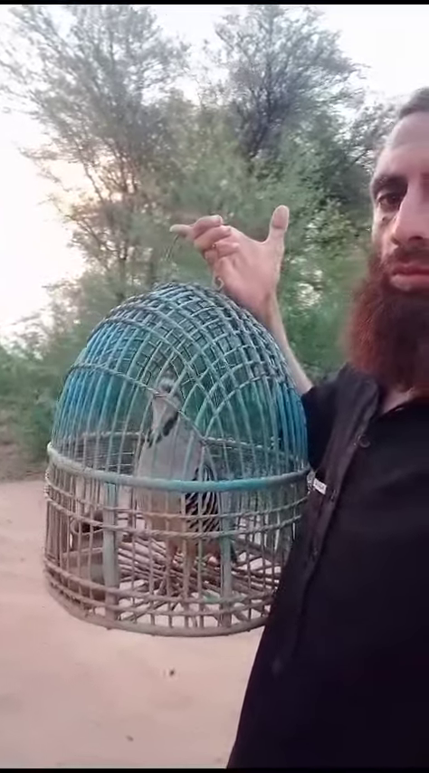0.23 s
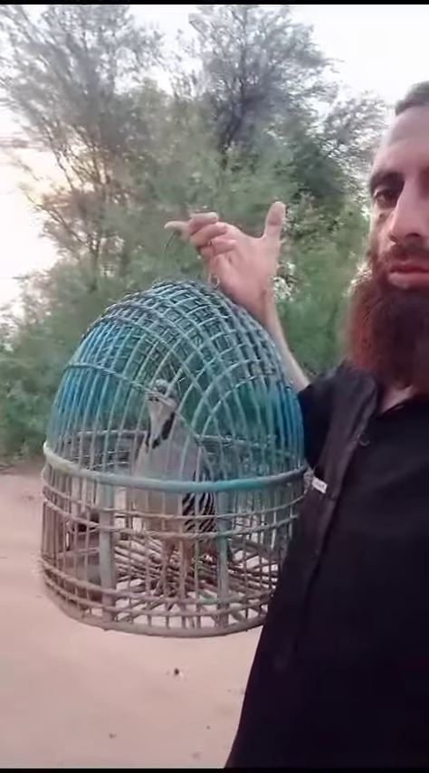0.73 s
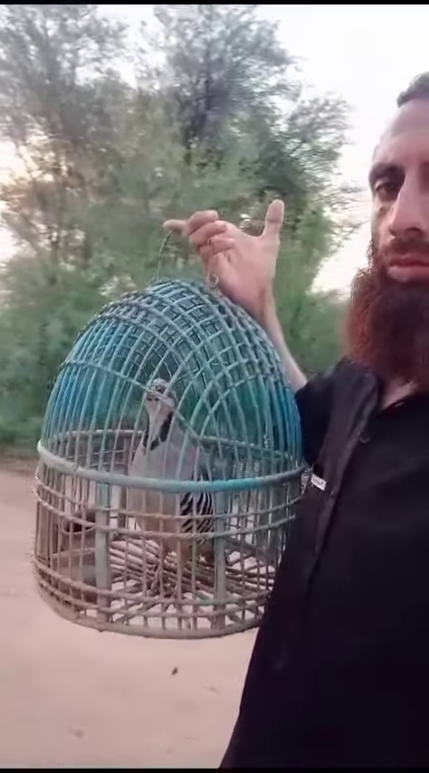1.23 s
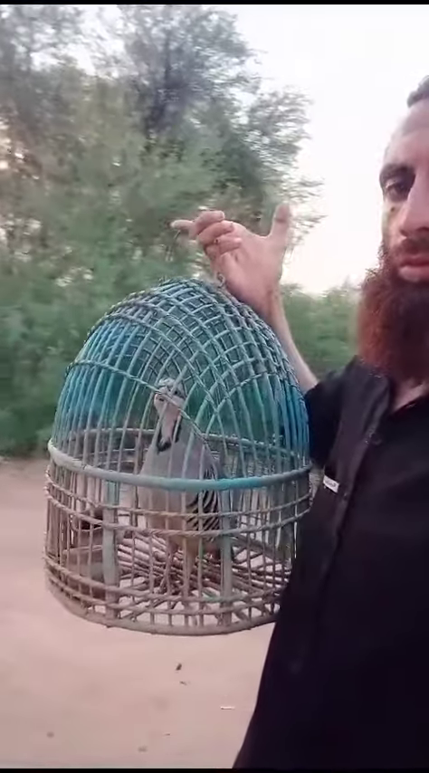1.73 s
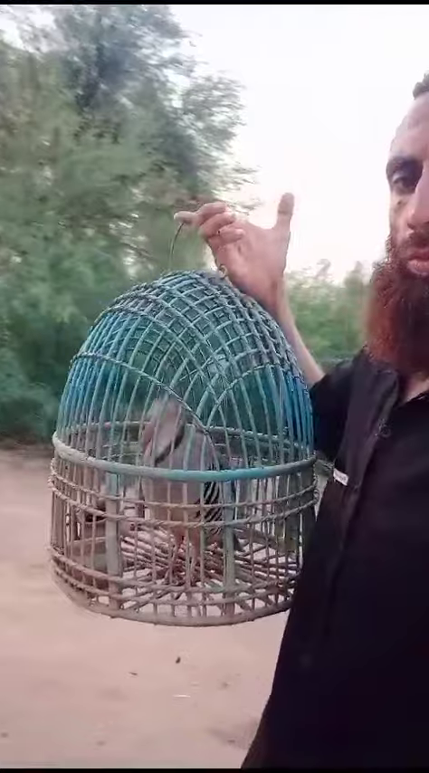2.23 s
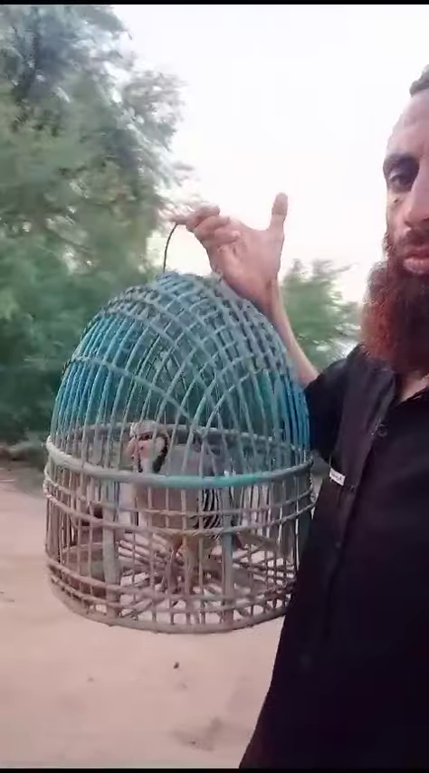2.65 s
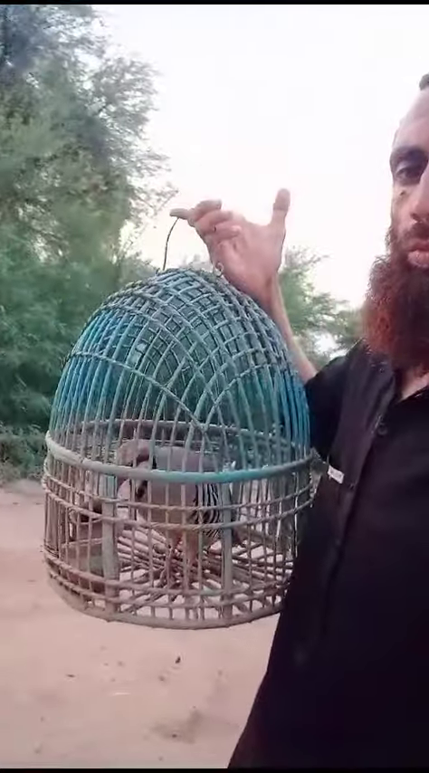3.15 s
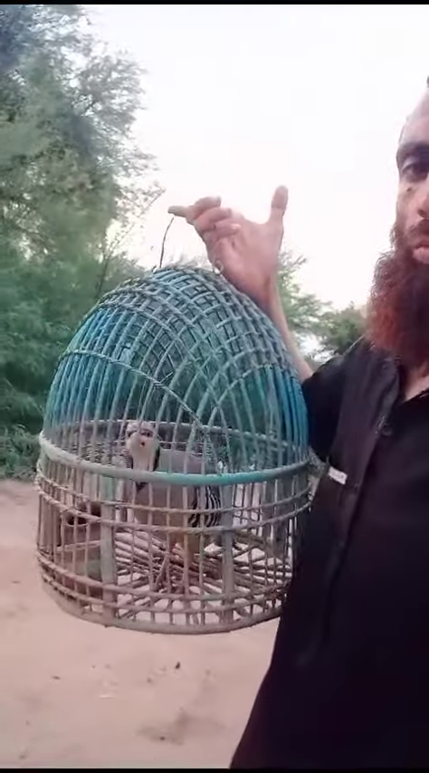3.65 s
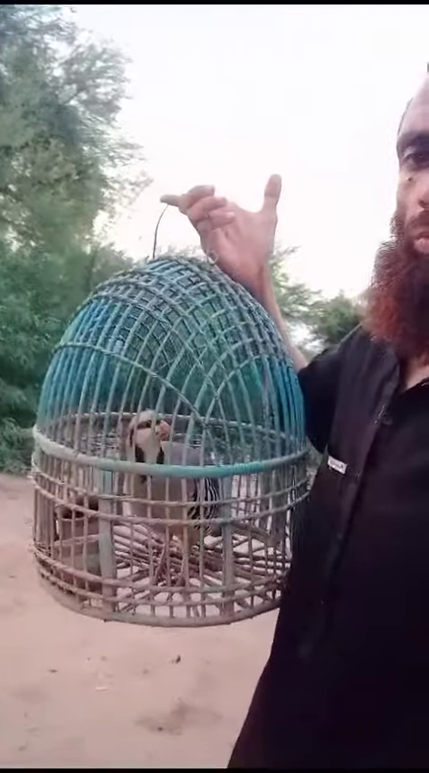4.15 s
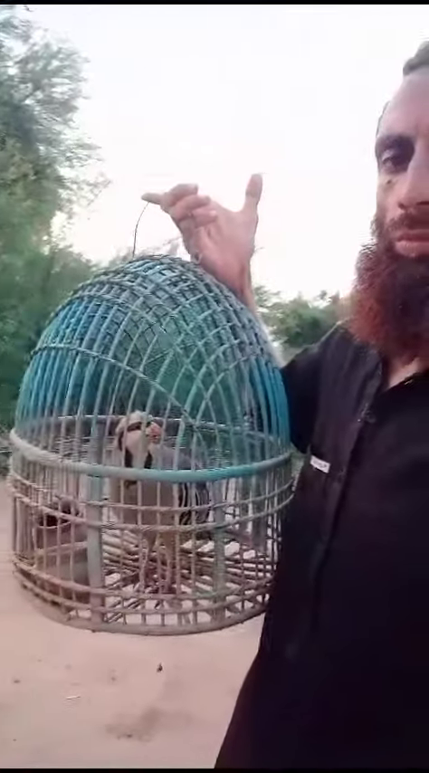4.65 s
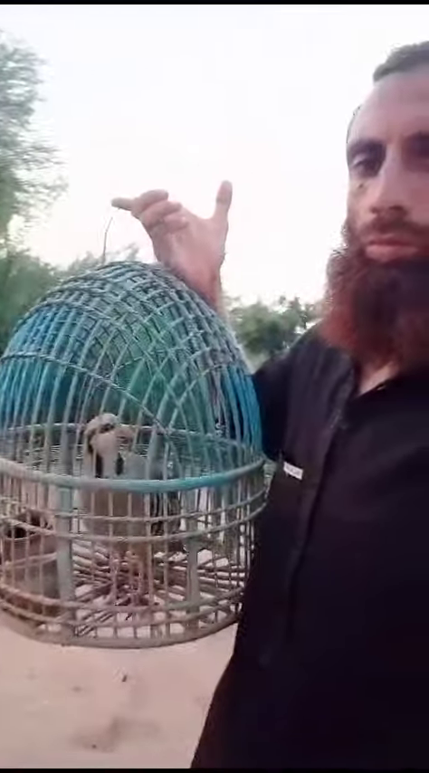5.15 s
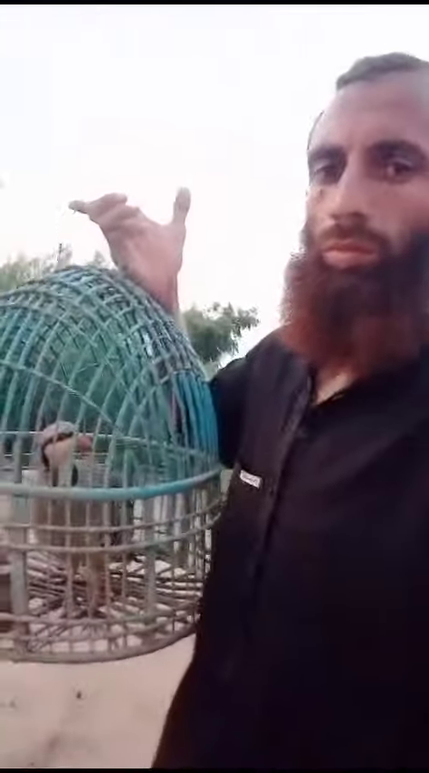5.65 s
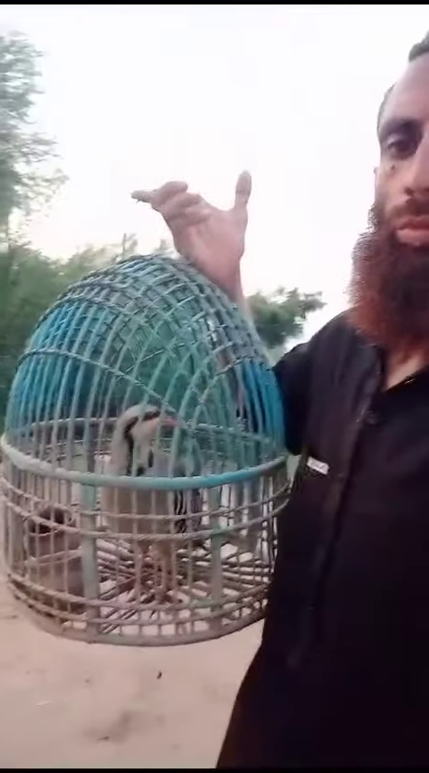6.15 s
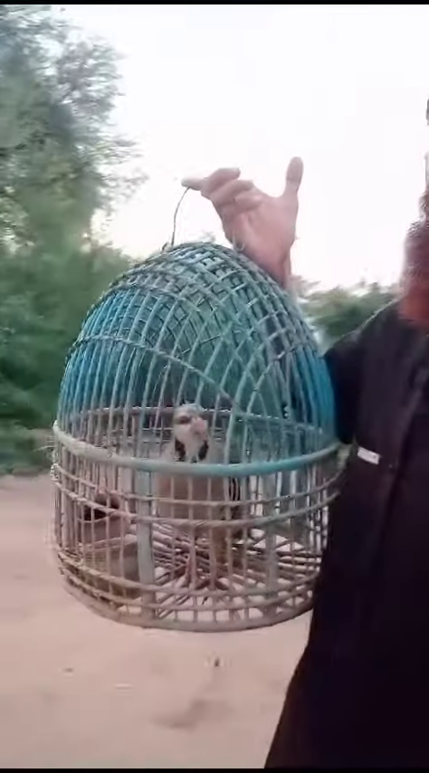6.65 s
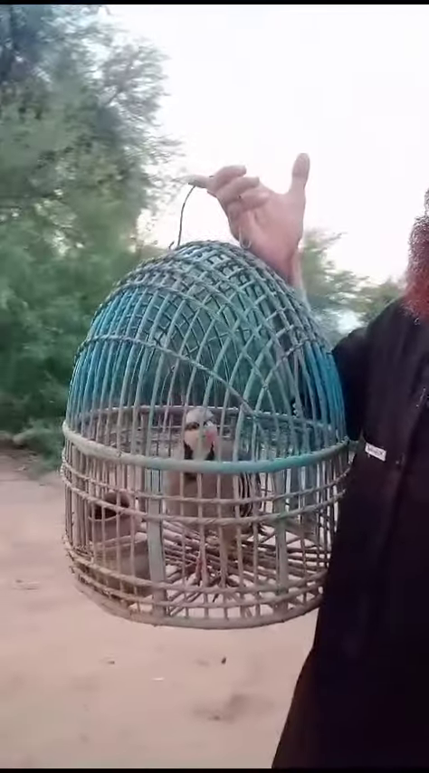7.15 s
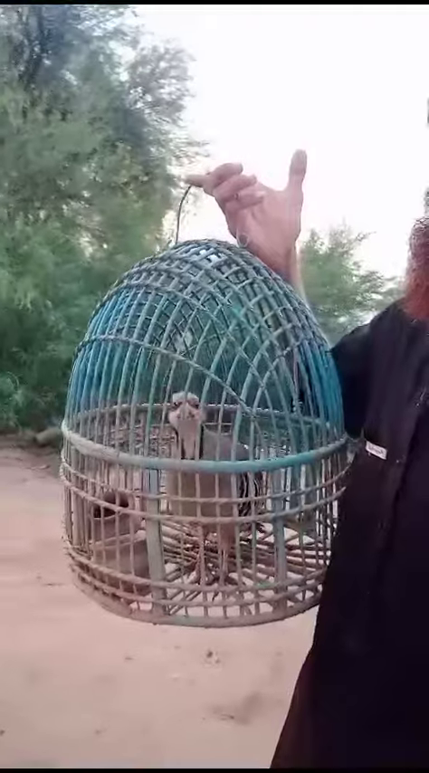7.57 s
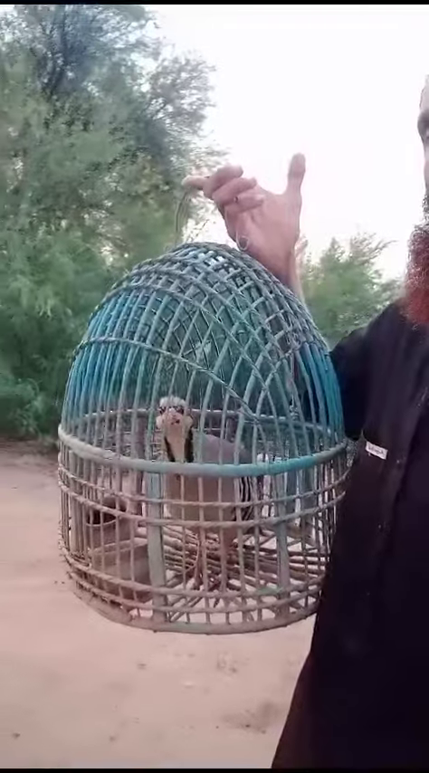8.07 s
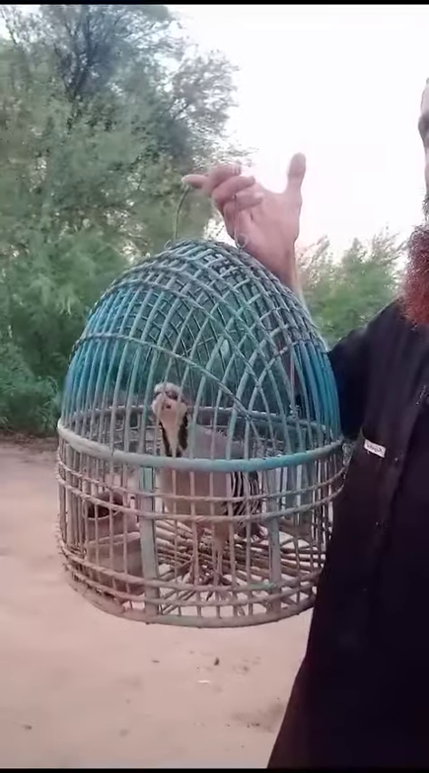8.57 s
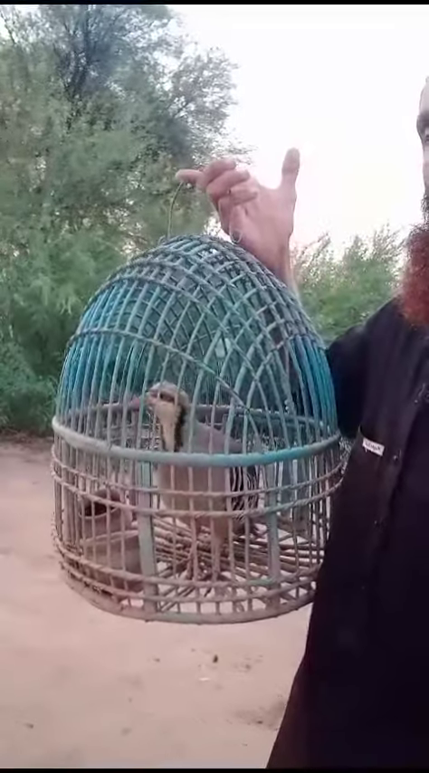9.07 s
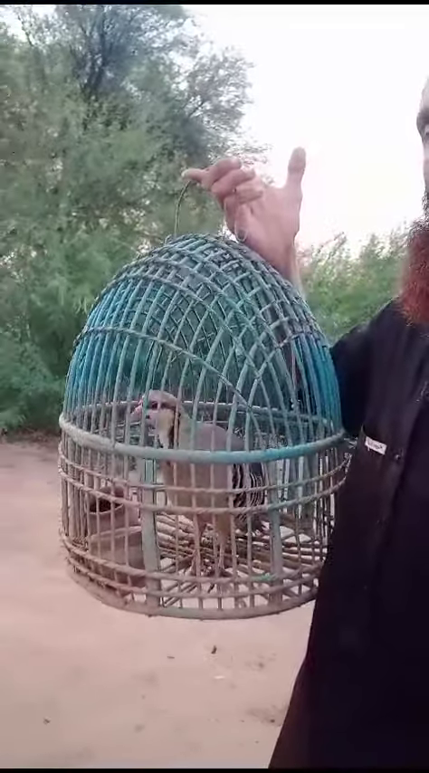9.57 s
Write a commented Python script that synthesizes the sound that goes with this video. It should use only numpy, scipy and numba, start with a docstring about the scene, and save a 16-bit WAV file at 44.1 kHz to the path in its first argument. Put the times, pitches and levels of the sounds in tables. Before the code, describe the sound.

For the first two and a half seconds there is only quiet countryside: a soft hiss of air, a faint, high, pulsing cricket, small birds chirping in the trees and the low throb of a far engine, with two tiny rustles at the very start. This background continues throughout. At about 2.6 seconds a caged partridge, at arm's length from the microphone, begins soft, hoarse, spaced clucks. From about 3.6 seconds they grow firmer and closer together, with an occasional thin rising squeak between them. Between 5 and 7 seconds they settle into a regular rhythm of five or six notes a second and swell strongly. From 7 seconds until the end, near 10 seconds, the bird gives loud, bright, raspy chucks, the longer ones with a double pulse, each ringing very briefly in the wicker cage.

```python
"""Soft outdoor hiss, a far throbbing engine, two rustles, a bush cricket and small birds in the trees.
From 2.6 s a chukar partridge in a wicker cage, at arm's length, works up from hoarse clucks to loud chucks.
Each note starts as a whistle of the syrinx, breaks into pulses that ring the throat and sags into a rasp;
the longest get a second push of air. The cage rings briefly after each."""
import sys
import numpy as np
from scipy import signal
from scipy.fft import rfft, irfft
from scipy.io import wavfile
from numba import njit

SR = 44100
rng = np.random.default_rng(int(sys.argv[2]) if len(sys.argv) > 2 else 0)


def file_out(sig):
    """Save sig as 16-bit WAV at sys.argv[1]."""
    # one column per channel
    cols = np.atleast_2d(sig).T
    # limit, then scale
    lim = np.clip(cols, -1, 1)
    pcm = np.round(lim * 32767).astype(np.int16)
    wavfile.write(sys.argv[1], SR, pcm)


N = 432180


def undb(db):
    """Decibels to gain."""
    return 10 ** (np.asarray(db) / 20)


def level(x, db=0):
    """Scale to an rms level."""
    return x * undb(db) / np.sqrt(np.mean(x ** 2) + 1e-20)


def add(out, start_s, x):
    """Mix x into out."""
    i = max(int(start_s * SR), 0)
    out[i:i + len(x)] += x[:max(len(out) - i, 0)]


def band(x, lo_hz, hi_hz, order=2):
    """Butterworth band-pass."""
    return signal.sosfilt(signal.butter(order, [lo_hz, hi_hz], "band", fs=SR, output="sos"), x)


def wander(n, rate_hz):
    """Random values joined by lines."""
    return np.interp(np.arange(n) * rate_hz / SR, np.arange(4096), rng.standard_normal(4096))


def phase_of(hz):
    """Phase of a moving frequency."""
    return 2 * np.pi * np.cumsum(hz) / SR


def between(points, share):
    """Value a share of the way along evenly spaced points."""
    return np.interp(share, np.linspace(0, 1, len(points)), points)


def bump(t, centre_s, width_s):
    """Bell-shaped swell."""
    return np.exp(-((t - centre_s) / width_s) ** 2)


@njit
def svf(x, hz, width_hz):
    """State-variable band-pass with a moving centre."""
    y, mid, low = np.empty(len(x)), 0., 0.
    for i in range(len(x)):
        g, damping = np.tan(np.pi * hz[i] / SR), width_hz / hz[i]
        v = (mid + g * (x[i] - low)) / (1 + g * (g + damping))
        mid, low, y[i] = 2 * v - mid, low + 2 * g * v, damping * v
    return y


def resonance(x, hz, width_hz):
    """Steep three-pass resonance, rms 1."""
    for _ in range(3):
        x = svf(x, hz * np.ones(len(x)), float(width_hz))
    return level(x)


def glide(length_s, path_hz, rough):
    """Wavering whistle that swells and fades along a pitch path."""
    n = int(length_s * SR)
    share = np.linspace(0, 1, n)
    hz = between(path_hz, share) * (1 + rough * wander(n, 600))
    return np.sin(np.pi * share) * np.sin(phase_of(hz))


def reflections(x, near_db, tail_db, t60_s):
    """Quick echoes off nearby surfaces, then a thin scatter from the trees."""
    t = np.arange(int(.6 * SR)) / SR
    near, tail = rng.standard_normal((2, len(t)))
    near = band(near, 500, 15000) * np.exp(-t / .0052) * (t > .0012)
    tail = band(tail, 570, 9500) * undb(-60 * t / t60_s) * (t > .012)
    echo = sum(undb(db) * h / np.linalg.norm(h) for h, db in [(near, near_db), (tail, tail_db)])
    return x + signal.fftconvolve(x, echo)[:N]


# air spectrum: (frequency [Hz], relative density [dB])
AIR_SPECTRUM = [(25, 0), (65, 14), (130, 7), (250, -5.5), (500, -6.5), (1000, 0.5), (2000, 2), (3200, 1.5),
                (5000, -0.5), (6500, 6), (7700, -12.5), (8200, -39), (13500, -19.5), (15300, -21.5)]


def air(level_db=-72.5, swell_db=1.2):
    """Soft, wavering outdoor hiss over a faint rumble."""
    bins_hz = np.fft.rfftfreq(N, 1 / SR) + 1
    hz, db = np.transpose(AIR_SPECTRUM)
    shape = undb(np.interp(np.log(bins_hz), np.log(hz), db))
    hiss = irfft(rfft(rng.standard_normal(N)) * shape, N)
    return level(hiss, level_db) * undb(swell_db * wander(N, 14))


# engine envelope: (time [s], level [dB])
ENGINE_LEVEL = [(0, -72.5), (.55, -75), (.7, -63.5), (1.1, -66.5), (1.5, -72.5), (3.6, -70.5), (4.5, -71),
                (5.45, -77), (6.119, -72.5), (6.35, -61), (7.0, -66), (7.35, -71), (7.519, -81.5),
                (8.0, -73.5), (8.33, -63.5), (8.68, -70), (9.6, -63.5), (9.72, -78)]


def engine(firing_hz=37.7, throb_hz=5.2, throb_db=2.5):
    """Far throbbing engine: mainly harmonics 2 and 3 of its firing rate carry."""
    phase = phase_of(firing_hz * (1 + .013 * wander(N, 7.1)))
    throb_phase = phase_of(throb_hz * (1 + .04 * wander(N, 2)))
    throb = undb(throb_db * np.cos(throb_phase) + 2 * wander(N, 20))
    hum = np.sin(2 * phase) * throb + undb(-12) * np.sin(3 * phase) + undb(-33.5) * np.sin(4 * phase)
    return level(hum) * undb(np.interp(np.arange(N) / SR, *np.transpose(ENGINE_LEVEL)))


# rustles: (time [s], length [s], level [dB])
SOFT_RUSTLES = [(.008, 0.085, -65.5), (0.161, 0.096, -66)]


def rustles():
    """Brief swells of high noise."""
    out = np.zeros(N)
    for start_s, length_s, db in SOFT_RUSTLES:
        n = int(length_s * SR)
        noise = band(rng.standard_normal(n), 3400, 6200, order=5)
        add(out, start_s, level(noise * np.hanning(n), db))
    return out


# bouts of song: (start [s], end [s])
SONG_BOUTS = [(.04, .08), (0.237, .62), (.778, 4.4), (4.191, 9.8)]
# wing-stroke envelope: (time [s], level [dB])
STROKE_LEVEL = [(0, -67), (1.3, -67), (2, -65), (3, -68.5), (4, -74), (9.8, -66)]


def cricket(period_s=.0635, pair_lag_s=.021):
    """Paired wing strokes, each a falling whistle as the scraper slows along the file."""
    out = np.zeros(N)
    starts_s = np.concatenate([np.arange(*bout, period_s) for bout in SONG_BOUTS])
    for start_s, (late, loud) in zip(starts_s, rng.standard_normal((200, 2))):
        db = np.interp(start_s, *np.transpose(STROKE_LEVEL)) + .66 * loud
        for lag_s in (0, pair_lag_s):
            stroke = glide(.014, [7900, 7100, 6350], rough=.01)
            add(out, start_s + lag_s + .0026 * late, level(stroke, db))
    return out


# clearest calls: (time [s], length [s], start [Hz], middle [Hz], end [Hz], level [dB], roughness [0-1])
BIRD_CALLS = [(0.177, 0.036, 5290, 5570, 5250, -64.5, 0.02), (0.357, 0.03, 5260, 5300, 5530, -62.5, 0.06),
              (1.657, 0.043, 5240, 5260, 5170, -69, 0.07), (2.099, 0.021, 1500, 1417, 1370, -62.5, 0.02),
              (2.178, .17, 1320, 1720, 1836, -65.5, .1), (2.274, .17, 1420, 1198, 910, -72, 0.09),
              (2.396, 0.15, 1180, 1910, 1186, -67, 0.18), (2.524, 0.27, 4120, 4270, 3700, -77, 0.1),
              (3.036, .14, 5890, 4140, 3800, -65.5, 0.07), (3.187, 0.051, 4290, 4730, 4280, -67, 0.07),
              (3.36, .073, 5700, 5930, 5430, -67.5, .025), (6.869, 0.04, 3750, 3770, 3730, -59.5, 0.07),
              (7.207, 0.043, 5640, 5440, 5240, -63.5, 0.06), (7.459, 0.04, 5330, 5650, 6100, -56.5, 0.06),
              (9.163, 0.11, 4570, 4230, 4100, -68.5, 0.07)]


def small_birds(chatter_hz=(2990, 6050), chatter_db=(-83, -75.5)):
    """Distant whistled calls over a chatter of faint random chirps."""
    out = np.zeros(N)
    for start_s, length_s, *path_hz, db, rough in BIRD_CALLS:
        add(out, start_s, level(glide(length_s, path_hz, rough), db))
    for when, size, high, slope in rng.random((520, 4)):
        path_hz = between(chatter_hz, high) * (1 + (slope - .65) * np.array([-.15, 0, .15]))
        chirp = glide(.045, path_hz, rough=.045)
        add(out, when * N / SR, level(chirp, between(chatter_db, size ** 2)))
    return out


def push(t, peak_s):
    """Jolt of air pressure: quick rise, slower release."""
    release = np.exp(-np.abs((t - peak_s) / .0084) ** 1.35)
    return np.where(t < peak_s, bump(t, peak_s, .00604), release)


def syrinx_buzz(t, hz, rough):
    """Membrane pulses and the rasp of air; roughness makes the beat uneven."""
    n = len(t)
    jitter = .07 * rough * wander(n, 700) + .0279 * wander(n, 60)
    phase = phase_of(hz * (1 + jitter))
    pulses = level(sum(np.cos(k * phase) for k in range(1, 28)))
    pulses *= 1 + .74 * rough * np.tanh(wander(n, 603.2))
    pulses *= 1 + .5 * rough * np.cos(phase / 2)  # subharmonic
    rasp = (.14 + .75 * rough) * rng.standard_normal(n) * (1 + .6 * np.cos(phase))
    return pulses, rasp


def syrinx_whistle(t, loud, double, rough, treble_db):
    """Falling whistle, cut off as the pulses take over; it returns on a second push."""
    start_hz, end_s = between((1651, 1835, 2117), loud), between((.024, .015, .017), loud)
    swell = np.clip((t - .003) / .0064, 0, 1) * np.clip((end_s - t) / .0019, 0, 1)
    swell += .5 * double * bump(t, .0472, .0082)
    phase = phase_of(start_hz * (1 - 1.325 * t) * (1 + .054 * rough * wander(len(t), 640)))
    return swell * (np.sin(phase) + undb(treble_db - 12) * np.sin(3 * phase))


def throat(source, hz, effort):
    """Two main throat resonances; the lower widens with effort."""
    lower = resonance(source, .94 * hz, width_hz=between((620, 747), effort))
    upper = resonance(source, 1.099 * hz, width_hz=516)
    return undb(between((-1.5, -2), effort)) * lower + undb(-11.5 + 4 * effort) * upper


def high_resonances(source, beak_ratio, presence_db, treble_db, effort):
    """Resonances from 3 to 15 kHz; the lowest three move with the beak."""
    modes = [(3120 * beak_ratio, 540, presence_db),
             (4200 * beak_ratio, 900, treble_db - 16.5 - 6.9 * effort),
             (6000 * beak_ratio, 808, treble_db),
             (9410, 2000, treble_db - 34.5),
             (11300, 2600, treble_db - 32),
             (14900, 1900, treble_db - 51.5 + 32.2 * effort ** 7)]
    return sum(undb(db) * resonance(source, hz, width_hz) for hz, width_hz, db in modes)


# course of a note: (time [note lengths], pitch [ratio], throat tuning [ratio], drive [dB])
NOTE_COURSE = [(0, 1.03, 1.54, 2), (0.199, 1.0, 1.015, 2.5), (.5, .98, 1, 4.5), (.78, .95, 0.92, 1),
               (.93, .8, .85, -4), (1.07, .62, .66, -13.5), (1.3, 0.84, 1.5, -68)]


def note(length_s, db, pitch_hz, treble_db):
    """One chuck: a whistle, then syrinx pulses ring the throat. Long notes get a second push."""
    t = np.arange(int(SR * .13)) / SR
    progress = t / length_s
    effort = np.interp(db, (-55.5, -31.5), (0, 1))
    loud = np.interp(db, (-49, -28.5), (0, 1))
    double, cluck = length_s > .0685, pitch_hz > 700

    share, pitch_ratio, throat_ratio, drive_db = np.transpose(NOTE_COURSE)
    sag_progress = progress ** (.5 + .5 * effort ** 3) * (1 + .102 * (1 - effort))  # soft notes sag early
    sag = np.interp(sag_progress, share, pitch_ratio)
    sag **= np.clip((length_s * 700 / pitch_hz - .036) / .00714, .1, 1)  # short, high clucks barely sag
    second_push = double * push(t, peak_s=.048)
    pressure = push(t, peak_s=.00678) + second_push
    rough = .58 if cluck else between((.95, .358), loud ** 1.79)
    rough = np.clip(rough + .52 * np.clip((progress - .68) / .32, 0, 1), 0, 1)  # the air runs out
    pulses, rasp = syrinx_buzz(t, pitch_hz * sag * (1 + .17 * pressure), rough)

    opening = .12 * np.clip((t - .001) / .003, 0, 1) + 1.4 * np.clip((t - .007) / .0037, 0, 1)
    catch = 1 - .63 * double * bump(t, .038, .0091)  # dip before the second push
    drive = undb(np.interp(progress, share, drive_db)) * opening * catch * (1 + .41 * second_push)
    source = drive * (pulses + rasp)
    bright = source * drive ** .5  # high resonances need strong drive and die first

    closing = np.interp(progress, share, throat_ratio)
    throat_hz = (between((1552, 1990), loud ** .58) + 90 * double) * closing
    beak_ratio = 1 + .028 * pressure + .33 * (closing - 1)
    presence_db = between((-22, -9.5), loud) + 3 * double
    # loud notes lose their fundamental as they sag
    fundamental = resonance(drive * pulses * sag ** (5 * effort - 3.4), pitch_hz * sag, 300)
    low_mid = resonance(source, 1.75 * pitch_hz * sag ** .5, 300)
    voice = (throat(source, throat_hz, effort)
             + undb(-10.5 - 9.3 * effort) * fundamental
             + undb(-9 - 12.8 * effort) * low_mid
             + high_resonances(bright, beak_ratio, presence_db, treble_db, effort))

    whistle = np.sqrt(3) * syrinx_whistle(t, loud, double, rough, treble_db)
    whistle_db = -15 if cluck else between((1.5, -6.5, 0), loud) + 4.5 * double
    return undb(db) * (voice * np.sqrt(length_s / t[-1]) + undb(whistle_db) * whistle)


# partridge notes: (time [s], length [s], level [dB], pitch [Hz])
PARTRIDGE_NOTES = [(2.584, 0.032, -60.5, 771), (2.95, 0.039, -62.5, 882), (3.285, 0.046, -56.5, 912),
                   (3.629, 0.04, -48, 740), (3.946, 0.045, -48, 828), (4.052, .052, -45.5, 652),
                   (4.342, 0.046, -48.5, 841.6), (4.443, 0.039, -52, 641.5), (4.684, 0.059, -46, 683),
                   (4.961, .044, -47, 614), (5.157, 0.053, -42.5, 660.5), (5.389, 0.044, -44.5, 632),
                   (5.591, 0.048, -42, 679.7), (5.793, 0.046, -43, 595.7), (5.971, 0.051, -43, 676),
                   (6.154, 0.052, -37.5, 659.3), (6.327, 0.05, -36.5, 614), (6.495, 0.049, -35, 608),
                   (6.656, 0.051, -33.5, 595.6), (6.82, .044, -32.5, 602), (6.98, 0.046, -31.5, 617),
                   (7.146, 0.043, -31, 615.4), (7.302, 0.068, -31, 630.6), (7.49, 0.045, -30.5, 620),
                   (7.649, 0.082, -30.5, 616.8), (7.868, 0.051, -29.5, 629), (8.036, 0.085, -29, 617.8),
                   (8.253, .05, -29.5, 622), (8.422, 0.077, -28.5, 615.6), (8.638, 0.07, -29.5, 599),
                   (8.836, .074, -28.5, 614), (9.047, 0.071, -29.5, 592.7), (9.247, .076, -29, 617),
                   (9.46, .074, -29.5, 590.3), (9.663, .079, -29.5, 607.4)]
# 6 kHz resonance: (time [s], level relative to the note [dB])
TREBLE_LEVEL = [(2.6, -17), (4.9, -17.5), (6.7, -7.5), (7.2, -10), (7.85, -8.5), (8.5, -3), (9.4, -2),
                (9.7, -6)]


def partridge():
    """Run of notes, growing louder, longer and brighter."""
    out = np.zeros(N)
    for start_s, length_s, db, pitch_hz in PARTRIDGE_NOTES:
        treble_db = np.interp(start_s, *np.transpose(TREBLE_LEVEL))
        add(out, start_s, note(length_s, db, pitch_hz, treble_db))
    return out


# cage resonances: (frequency [Hz], width [Hz], gain [dB])
CAGE_MODES = [(1510, 40, -6), (1740, 51, 0), (2150, 90, -8), (2305, 28, -3), (2995, 60, -8),
              (5790, 120, -18)]


def cage(x):
    """Narrow resonances colour each note and ring briefly after it."""
    ring = sum(undb(db) * svf(x, np.full(N, float(hz)), float(width_hz))
               for hz, width_hz, db in CAGE_MODES)
    return undb(-3.5) * (x + ring)


# squeaks: (time [s], level [dB])
PARTRIDGE_SQUEAKS = [(3.139, -68), (3.444, -66), (4.238, -66.5), (5.292, -66.5), (7.403, -62),
                     (8.397, -66.5), (8.97, -66), (9.189, -62.5)]


def squeaks():
    """The partridge's thin rising whistles between notes."""
    out = np.zeros(N)
    for start_s, db in PARTRIDGE_SQUEAKS:
        add(out, start_s, level(glide(.038, [1200, 1650, 2300], rough=.11), db))
    return out


def scene():
    """Caged bird close by, countryside behind it; mono."""
    caged_bird = reflections(cage(partridge() + squeaks()), near_db=-1.5, tail_db=-18, t60_s=.16)
    trees = reflections(small_birds() + rustles(), near_db=1, tail_db=-8, t60_s=.3)
    insect = reflections(cricket(), near_db=-19.5, tail_db=-13.5, t60_s=.12)
    return (caged_bird + trees + insect + engine() + air())[None]


def record(dry):
    """Steep low-pass at 16 kHz."""
    return signal.sosfilt(signal.ellip(10, .2, 70, 16000, fs=SR, output="sos"), dry)


dry = scene()
out = record(dry)
file_out(out)
```